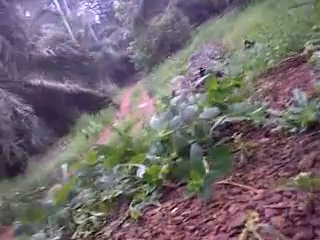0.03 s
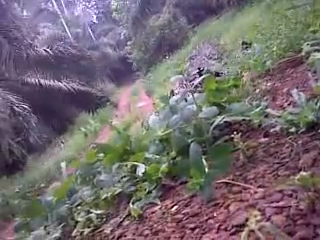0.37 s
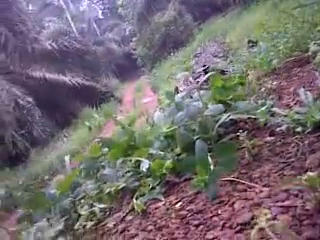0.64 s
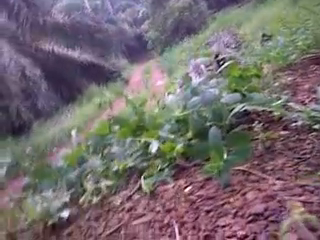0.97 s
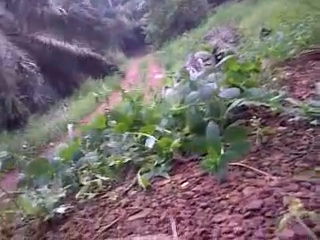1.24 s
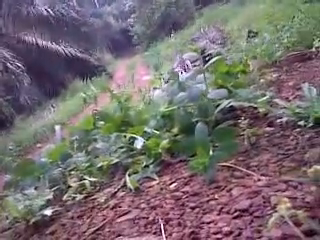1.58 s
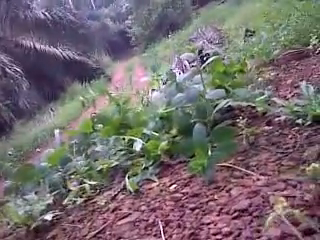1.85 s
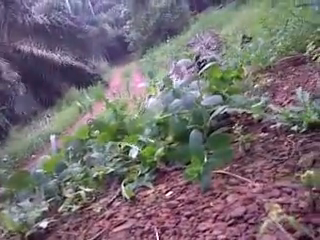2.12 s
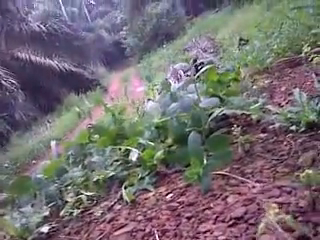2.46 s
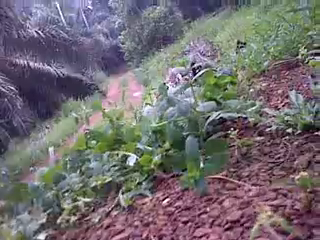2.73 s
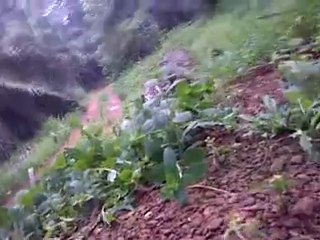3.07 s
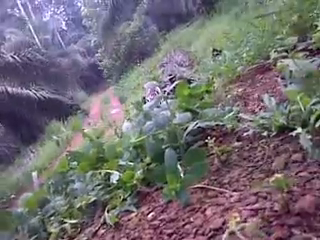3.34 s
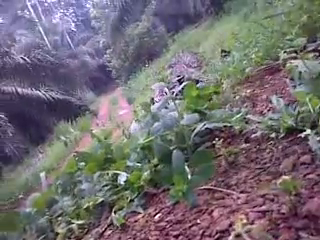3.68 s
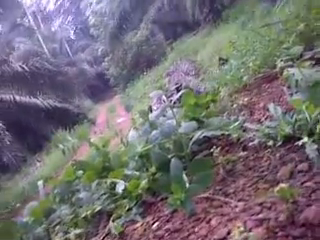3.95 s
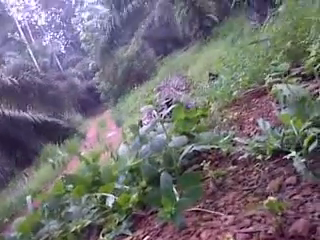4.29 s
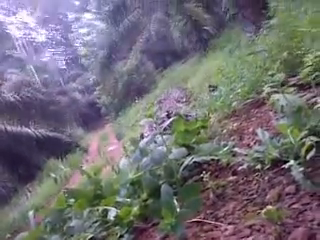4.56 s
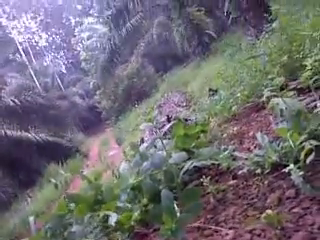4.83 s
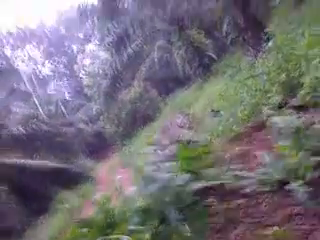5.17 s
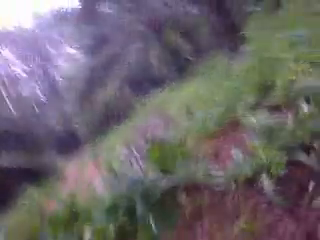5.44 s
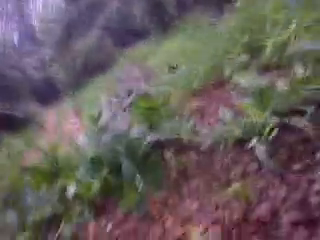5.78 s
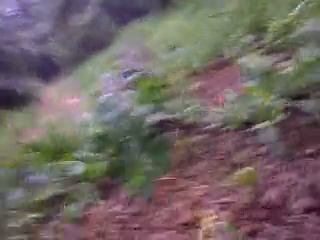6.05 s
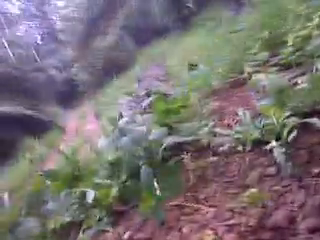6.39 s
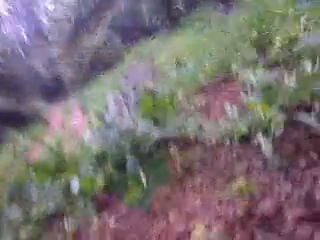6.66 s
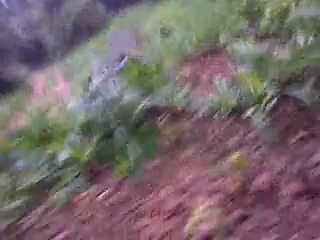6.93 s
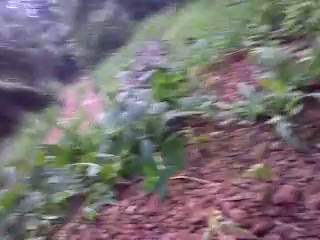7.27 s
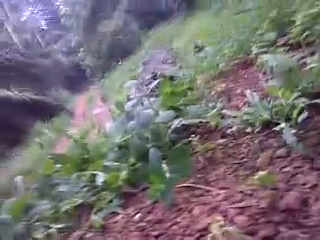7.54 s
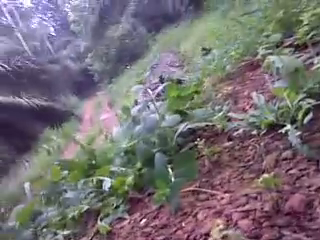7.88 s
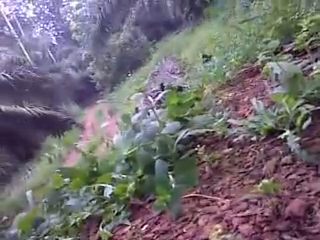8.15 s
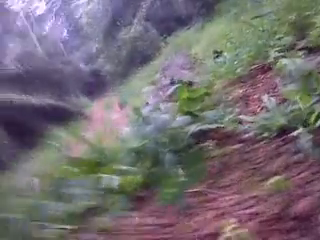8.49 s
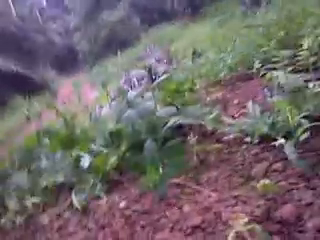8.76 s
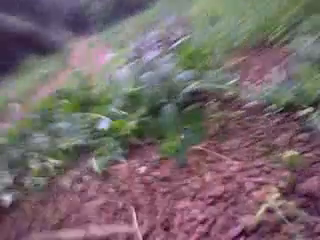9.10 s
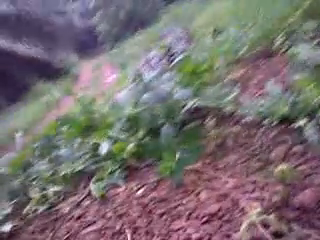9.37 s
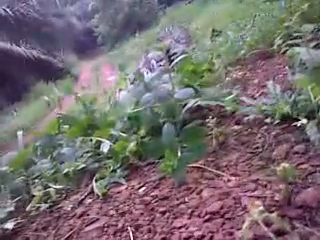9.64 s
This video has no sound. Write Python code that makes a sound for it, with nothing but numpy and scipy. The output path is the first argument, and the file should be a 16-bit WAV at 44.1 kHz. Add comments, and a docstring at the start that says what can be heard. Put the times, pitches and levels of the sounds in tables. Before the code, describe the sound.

Close purring dove coos and fainter distant ones sound over outdoor hiss, a far rooster crow, light rustling and handling taps.

```python
"""A dove purrs close by on a palm-covered slope; it and a farther dove coo in short arched notes and
rolling, falling purrs, each a nearly pure tone from the syrinx, reinforced by the resonant crop.
A distant rooster crows in hoarse harmonics and insects shrill in narrow bands over rumble and hiss.
Leaves and clothes rustle, and knocks now and then ring the casing of the hand-held microphone,
whose gain control ducks the background after the loud coos."""
import sys
import numpy as np
from scipy import signal
from scipy.fft import rfft, irfft, next_fast_len
from scipy.io import wavfile
from scipy.ndimage import uniform_filter1d, minimum_filter1d

SR = 44100
rng = np.random.default_rng(int(sys.argv[2]) if len(sys.argv) > 2 else 0)


def pcm_store(signal):
    """Save signal as 16-bit PCM."""
    levels = np.round(np.clip(np.atleast_2d(signal), -1, 1) * 32767)
    wavfile.write(sys.argv[1], SR, levels.astype(np.int16).T)


N = 433062
TIME = np.arange(N) / SR

# The hand grows restless and settles. Each row: time in seconds, relative activity in dB.
RESTLESSNESS = [(.5, -4), (1.0, 6.5), (2.8, 1), (5.4, 3), (6.2, -2.5), (8.5, -3.5), (9.8, -9)]


def near_dove():
    """Direct sound dominates at close range: an almost dry coo with a faint rasp and husk of breath."""
    # Each row: start, crest and end in seconds, top pitch in Hz, exponent of the drop, drive in dB.
    notes = [(2.867, 2.909, 2.96, 547, 1.4, -9), (3.069, 3.175, 3.222, 671, 4.1, -10)]
    # Each row: start, onset of sag, end of rolls and end in seconds, top and low pitch in Hz,
    # initial rolls per second, drive in dB.
    purrs = [(-.256, .06, .078, .207, 697, 505, 38.1, -12.3),
             (3.376, 3.5, 3.642, 3.797, 706, 510, 38.1, -8.5)]
    # Reflections from the trees. Each row: delay in seconds, gain in dB.
    echoes = [(.12, -37), (.255, -40)]
    # How strongly the voice reaches the trees. Each row: time in seconds, gain in dB.
    reach = [(.2, -9.5), (2.9, 3.5)]
    out = np.zeros(N)
    for gesture in [note(row) for row in notes] + [purr(row, scoop_hz=215, sag_power=1.8) for row in purrs]:
        add(out, *coo(gesture))
    out *= 1 + from_db(-41) * band_noise(450, 500)   # rasp
    sounding = uniform_filter1d(np.abs(out), size=200).clip(0) ** .25
    out += from_db(-44.5) * sounding * band_noise(680, 640)   # air through the syrinx
    send = from_db(contour(TIME, reach))
    return out + grove(out * send, echoes, scatter_db=-34.5, t60=1.0)


def far_dove():
    """Scattering by the trees blurs a fainter, less steady song of the same kind."""
    # Each row: start, crest and end in seconds, top pitch in Hz, exponent of the drop, drive in dB.
    notes = [(1.272, 1.402, 1.455, 687.5, 3, -47), (5.35, 5.482, 5.535, 695, 2.6, -45.5),
             (7.152, 7.282, 7.32, 668, 2.7, -47), (8.732, 8.864, 8.91, 656, 3, -53),
             (8.993, 9.123, 9.165, 670, 3, -44.5)]
    # Each row: start, onset of sag, end of rolls and end in seconds, top and low pitch in Hz,
    # initial rolls per second, drive in dB.
    purrs = [(1.556, 1.601, 2.5, 2.05, 732.4, 579.6, 46.25, -45),
             (5.664, 5.7, 6.46, 6.15, 723, 597, 43.5, -45),
             (7.463, 7.529, 7.9, 7.96, 698, 621.7, 47.8, -45),
             (9.313, 9.348, 11.3, 9.78, 725, 591, 47.65, -45.5)]
    # Reflections from the trees. Each row: delay in seconds, gain in dB.
    echoes = [(0.017, -24), (0.049, -42), (.11, -20)]
    gestures = [note(row, flutter=.58) for row in notes]
    gestures += [purr(row, scoop_hz=78.7, sag_power=1.25) for row in purrs]
    out = np.zeros(N)
    for gesture in gestures:
        add(out, *coo(gesture, chirp=.15, jitter=.018, shimmer_db=2.1, uneven=.11, octave_db=-24))
    return out + grove(out, echoes, scatter_db=-7, t60=.6)


def coo(gesture, chirp=.16, jitter=.004, shimmer_db=.25, uneven=0, octave_db=-41.5):
    """Source and filter: the syrinx chops a tone into rolls, loudest at the inflated crop's resonance."""
    # Resonance curve of the crop. Each row: pitch in Hz, gain in dB.
    crop = [(370, -35.5), (520, -21.5), (595, -10.5), (645, -1.5), (680, 0), (740, -1)]
    at, fade, hz, drive_db, rolls_per_s, depth = gesture
    db = drive_db + contour(hz, crop)
    depth = np.clip(depth, 0, 1)
    turn = (np.cumsum(rolls_per_s) / SR + uneven * drift(36, len(at))) % 1
    swell = 1 - depth + depth * np.abs(np.sin(np.pi * turn)) ** 1.15
    arch = (turn - .5) - (turn - .5) ** 2   # each roll rises fast in pitch, then levels off
    hz = hz * (1 + chirp * depth * arch + jitter * drift(150.6, len(at)))
    phase = 2 * np.pi * np.cumsum(hz) / SR
    falter_db = shimmer_db + .06 * (db.max() - db)   # the tone falters more when soft
    fundamental = from_db(db + falter_db * drift(160, len(at))) * swell
    # a little octave leaks through the crop, more at low pitch, and dies with the voice
    octave = from_db(drive_db + octave_db + 2.5 * drift(160, len(at))) * swell
    octave *= (np.maximum(hz, 500) / 600) ** -2
    octave *= np.minimum(fundamental / from_db(drive_db - 30), 1)
    return at, np.sqrt(2) * fade * (fundamental * np.sin(phase) + octave * np.sin(2 * phase))


def note(row, flutter=0, flutters_per_s=40, rest_hz=355.4, rise_power=1.9):
    """Frequency glide: the gesture of a plain note arches up from the resting pitch and back."""
    start, crest, end, top_hz, drop_power, db = row
    at, t, fade = span(start, end)
    slack = (1 - ramp(t, start, crest - start)) ** rise_power + ramp(t, crest, end - crest) ** drop_power
    hz = top_hz - (top_hz - rest_hz) * slack
    return at, fade, hz, db, np.full(len(t), flutters_per_s), flutter


def purr(row, scoop_hz, sag_power, scoop_s=.035, collapse_s=.0247, collapse_hz=96, smoothing_s=.016):
    """Amplitude modulation: rolls quicken to a limit as the pitch scoops up, holds, sags and collapses."""
    start, sag, smooth, end, top_hz, low_hz, first_per_s, db = row
    at, t, fade = span(start, end)
    hz = top_hz - scoop_hz * (1 - ramp(t, start, scoop_s))
    hz -= (top_hz - low_hz) * ramp(t, sag, end - sag) ** sag_power
    hz -= collapse_hz * ramp(t, end - collapse_s, collapse_s)
    rolls_per_s = np.minimum(first_per_s + 84 * (t - start), 66)
    rolling = 1 - ramp(t, smooth - smoothing_s / 2, smoothing_s)
    flutter = .49 * ramp(t, smooth, end - smooth)   # grows if the rolls stop before the voice does
    return at, fade, hz, db, rolls_per_s, rolling + flutter


def knocks(grit_db=-21, grit_s=.006, lead_s=.0023, thump_lag_s=.0019, ticks_per_s=4):
    """Modal ringing: a gritty contact excites the casing; the soft part of the blow follows as a thump."""
    # Each row: time in seconds, strength in dB, relative thump in dB, thump pitch in Hz,
    # relative snap in dB.
    blows = [(1.526, -26, -9, 207, -15), (1.748, -27, -1, 151, -1), (1.773, -29.5, -3, 150, -8),
             (1.821, -19, -6, 201, -9), (2.2975, -15, -8.5, 181, -6), (2.803, -23, -10.5, 160, -3),
             (2.831, -33.5, -14, 180, 0), (2.884, -22.5, -14, 180, -4), (5.133, -29, -8.5, 197, -9),
             (5.465, -19, -14, 189, -4), (5.645, -33.5, -8, 178, -17), (5.796, -35, -4, 270, -21),
             (6.669, -29.5, -22, 200, -4), (7.041, -25.5, -6, 290, -19), (8.131, -34.5, 2, 213, -19),
             (8.262, -33, 1.5, 209, -28), (9.045, -22.5, -3.5, 185, -6.5), (9.046, -30, 6, 512, -9),
             (9.356, -28, 2.5, 184, -26)]
    # Modes of the casing. Each row: frequency in Hz, gain in dB, 60 dB decay time in seconds.
    casing_modes = [(414, -19.5, 0.038), (646, -8.5, 0.03), (880, 0.5, 0.0058), (1073, -4.5, 0.022),
                    (1480, -12.5, 0.0073), (2010, -10.5, 0.015), (2540, -2, 0.0077), (3350, -2, 0.0037),
                    (4300, -14, 0.0059)]
    # Soft low modes of the held body. Each row: multiple of the thump pitch, gain in dB,
    # 60 dB decay time in seconds.
    thump_modes = [(1, -2, 0.051), (1.7, -18, 0.1)]
    body, snap, thumps = np.zeros((3, N))
    steps = np.arange(-SR // 100, SR // 10)
    t = steps / SR
    grit = from_db(grit_db) * np.exp(-np.abs(t) / np.where(t < 0, lead_s, grit_s)) / 2
    push = 1. * (steps == int(thump_lag_s * SR))
    for s, db, thump_db, thump_hz, snap_db in blows:
        at = int(s * SR) + steps
        contact = (steps == 0) + grit * rng.standard_normal(len(t))
        add(body, at, from_db(db) * contact)
        add(snap, at, from_db(db + snap_db) * contact)
        for multiple, mode_db, t60 in thump_modes:
            add(thumps, at, from_db(db + thump_db + mode_db) * ring(push, multiple * thump_hz, t60))
    # fingers tick on the casing at random, more often when the hand is restless
    ticks = from_db(-48) * grains(ticks_per_s * from_db(contour(TIME, RESTLESSNESS)), spread_db=3)
    rings = sum((-1) ** k * from_db(db) * ring(ticks + (snap if hz > 1800 else body), hz, t60)
                for k, (hz, db, t60) in enumerate(casing_modes))
    low_cut = signal.butter(2, 90, "high", fs=SR, output="sos")
    return signal.sosfilt(low_cut, from_db(-1) * rings + thumps)


def rooster(jitter=.065, shimmer=.57):
    """Jitter and shimmer roughen a harmonic series: a distant crow, hoarse around one clear note."""
    # Each row: start, crest and end in seconds, first and last pitch in Hz, crest level in dB,
    # swell in dB, roughness from 0 to 1.
    syllables = [(0.101, 0.233, .3, 550, 650, -50, 4, 0.67), (0.431, 0.458, .5, 534, 529, -53.5, 4, 0.4),
                 (0.468, 0.51, .66, 546.5, 539, -39, 19, 0.06),
                 (0.681, 0.878, 1.22, 547.4, 521, -49, 5, .75)]
    # Each row: relative levels of harmonics 2 to 6 of one syllable in dB.
    spectra = [(-23, 1, -2.5, -8.5, -19), (-24, -3, -10, -11, -15), (2, -19, 16.5, -13, -3),
               (-10.5, -2, -5.5, -5, -9)]
    out = np.zeros(N)
    for (start, crest, end, first_hz, last_hz, db, swell_db, rough), harmonics in zip(syllables, spectra):
        at, t, fade = span(start, end)
        hz = np.interp(t, [start, end], [first_hz, last_hz])
        phase = 2 * np.pi * np.cumsum(hz * (1 + jitter * rough * drift(220, len(at)))) / SR
        voice = sum(from_db(h) * np.sin(k * phase) for k, h in enumerate(harmonics, 2))
        voice *= 1 + shimmer * rough * drift(500, len(at))
        envelope = from_db(db - swell_db * np.interp(t, [start, crest, end], [1, 0, 1]))
        add(out, at, rms_one(voice) * fade * envelope)
    return out + grove(out, [], scatter_db=-5, t60=.4)


def rustle():
    """Tiny snaps superpose into noise: crunchy plants and brighter cloth, in strokes over faint stirring."""
    # Strokes on plants and on cloth. Each row: time in seconds, strength in dB, half length in seconds.
    scuffs = [(1.19, -51.5, 0.11), (1.278, -46.5, .029), (1.38, -42.5, 0.053), (1.53, -51.5, 0.044),
              (1.86, -50.5, 0.033), (2.35, -54.5, 0.014), (3.01, -57, 0.049), (3.79, -53.5, 0.056),
              (4.07, -50, 0.021), (4.63, -57, 0.1), (5.13, -53.5, 0.045), (5.3, -49, 0.015),
              (5.37, -56, .046), (6.95, -55, 0.049), (8.32, -58.5, 0.016), (8.55, -51, .012),
              (8.68, -58.5, .035), (9.02, -56, .046)]
    brushes = [(.04, -53.5, 0.071), (1.17, -53.5, .04), (1.275, -40, 0.02), (1.38, -47, 0.054),
               (1.88, -45.5, 0.019), (2.045, -46.5, 0.015), (2.68, -57, 0.02), (2.94, -60.5, 0.048),
               (3.45, -52.5, 0.038), (3.68, -54.5, 0.071), (4.39, -52, 0.014), (4.892, -52.5, 0.0089),
               (5.197, -50.5, 0.012), (5.502, -56.5, 0.029)]
    # Their spectra. Each row: frequency in Hz, relative level in dB.
    plant_spectrum = [(60, -41.5), (130, -14.5), (250, 4), (450, 2.5), (900, 1.5), (1400, -2), (2000, -8),
                      (3200, -8), (4500, -16.5), (7000, -24.5), (14000, -27.5)]
    cloth_spectrum = [(600, -3), (1500, -7), (3000, 2), (5500, -7.5), (7000, -3), (9000, -9.5),
                      (11000, -14), (14000, -14.5)]
    crunch = colour(grains(per_s=1800, spread_db=2.5), plant_spectrum) * from_db(5 + 2.8 * drift(60, N))
    swish = colour(grains(per_s=9000, spread_db=2.5), cloth_spectrum) * from_db(2.5 + 1.2 * drift(60, N))
    stir_db = contour(TIME, RESTLESSNESS) + 4 * np.minimum(drift(15, N), 2)
    plants = np.hypot(swells(scuffs), from_db(stir_db - 65)) * crunch
    cloth = np.hypot(swells(brushes), from_db(stir_db - 68.5)) * swish
    return plants + cloth


def insects(throb_db=1.0, waver_s=.003):
    """A far chorus merges into narrow-band noise that throbs unevenly and wavers a little in pitch."""
    # Each row: centre frequency in Hz, bandwidth in Hz, relative level in dB.
    bands = [(3216, 130, -3), (3417, 140, -4), (4740, 710, -4.5)]
    chorus = sum(from_db(db + throb_db * drift(55, N)) * band_noise(hz, width) for hz, width, db in bands)
    wander = uniform_filter1d(drift(2, N), size=SR // 4)
    return from_db(-63.5) * np.interp(TIME + waver_s * wander, TIME, chorus)


def air():
    """Stationary broadband noise: low outdoor rumble and an even hiss."""
    # Each row: frequency in Hz, relative spectral density in dB.
    spectrum = [(20, -7.5), (45, 0.5), (90, 4.5), (160, 0.5), (280, -6), (450, -15), (1000, -16),
                (1600, -22), (2700, -20.5), (4000, -22.5), (6500, -23.5), (8500, -25.5), (10500, -21.5),
                (14000, -23.5)]
    return from_db(-54) * colour(rng.standard_normal(N), spectrum)


def grove(x, echoes, scatter_db, t60):
    """Reverberation: discrete echoes and an exponentially dying scatter from trunks and fronds."""
    t = TIME[:SR]
    response = rng.standard_normal(SR) * from_db(-60 * t / t60) * (1 - np.exp(-t / .02))
    response *= from_db(scatter_db) / np.linalg.norm(response)
    for delay, db in echoes:
        response[int(delay * SR)] += from_db(db)
    return signal.fftconvolve(x, response)[:N]


def ring(x, hz, t60):
    """Damped resonator: a unit click sets a sine of height 1 ringing."""
    r, w = from_db(-60 / (t60 * SR)), 2 * np.pi * hz / SR
    return signal.lfilter([0, np.sin(w)], [1, -2 * r * np.cos(w), r * r], x + 1e-18)


def grains(per_s, spread_db):
    """Shot noise: independent tiny snaps of uneven size."""
    sizes = from_db(spread_db * np.minimum(rng.exponential(1, N), 4))
    return (rng.random(N) < per_s / SR) * sizes * rng.choice([-1, 1], N)


def swells(rows):
    """Incoherent summation: the envelope of bell-shaped strokes whose powers add."""
    t = TIME[::40]
    power = sum(from_db(db) ** 2 * np.exp(-((t - s) / half) ** 2) for s, db, half in rows)
    return np.interp(TIME, t, np.sqrt(power))


def band_noise(hz, width_hz):
    """Band-pass filtered noise of unit power."""
    sos = signal.butter(2, [hz - width_hz / 2, hz + width_hz / 2], "band", fs=SR, output="sos")
    return rms_one(signal.sosfilt(sos, rng.standard_normal(N)))


def colour(x, points):
    """Spectral shaping along a logarithmic frequency axis, to unit power."""
    hz, db = np.transpose(points)
    size = next_fast_len(N)
    bins = np.maximum(np.arange(size // 2 + 1) * SR / size, 1)
    gain = from_db(np.interp(np.log(bins), np.log(hz), db))
    return rms_one(irfft(rfft(x, size) * gain, size)[:N])


def drift(hz, size):
    """Random modulation of spread 1 that changes about hz times a second."""
    knots = rng.standard_normal(4000)
    return np.interp(np.arange(size) / SR * hz % 3999, np.arange(4000), knots) * np.sqrt(3 / 2)


def span(start, end):
    """Sample indices of a call, their times, and a short fade at both ends."""
    at = np.arange(int(start * SR), int(end * SR))
    return at, at / SR, np.clip(np.minimum(at - at[0], at[-1] - at) / (.003 * SR), 0, 1)


def ramp(t, start, length):
    """Linear rise from 0 to 1."""
    return np.clip((t - start) / max(length, 1e-3), 0, 1)


def contour(x, points):
    """Linear interpolation between points."""
    return np.interp(x, *np.transpose(points))


def add(out, at, sound):
    """Superpose a sound at its sample indices."""
    inside = (at >= 0) & (at < N)
    out[at[inside]] += sound[inside]


def from_db(db):
    """Decibels to amplitude ratio."""
    return 10 ** (np.asarray(db) / 20)


def rms_one(x):
    """Scale to unit power."""
    return x / np.sqrt(np.mean(x ** 2) + 1e-20)


def scene():
    """Superposition: the pressures of all sources add at one microphone."""
    return (near_dove() + far_dove() + rooster() + knocks() + rustle() + insects() + air())[None]


def record(dry, threshold_db=-26, squeeze=.3, hold_s=.75, release_db_per_s=6, cutoff_hz=14300):
    """Compression: the gain ducks on loud sound, holds and slowly recovers; a low-pass cuts the top."""
    level_db = 10 * np.log10(np.maximum(uniform_filter1d(dry[0] ** 2, size=400), 1e-12))
    duck_db = squeeze * np.maximum(level_db - threshold_db, 0)
    half = int(hold_s * SR / 2)
    held_db = -minimum_filter1d(-duck_db, 2 * half + 1, origin=half, mode="nearest")
    released_db = np.maximum.accumulate(held_db + release_db_per_s * TIME) - release_db_per_s * TIME
    gain = from_db(-uniform_filter1d(released_db, size=1500))
    top_cut = signal.ellip(12, .1, 70, cutoff_hz, fs=SR, output="sos")
    return signal.sosfilt(top_cut, dry * gain)


dry = scene()
out = record(dry)
pcm_store(out)
```